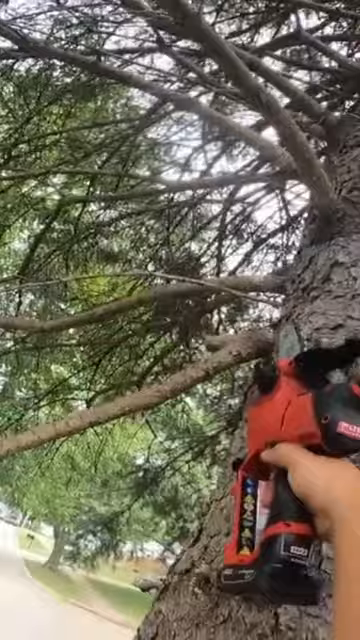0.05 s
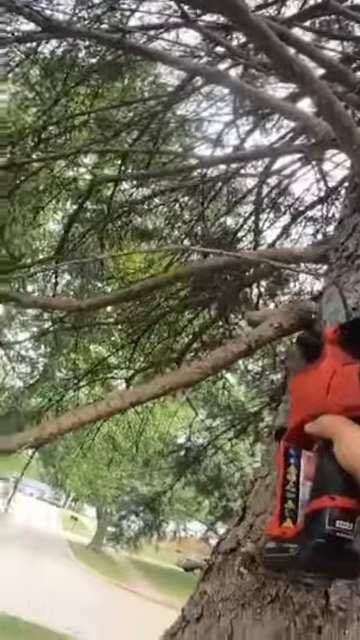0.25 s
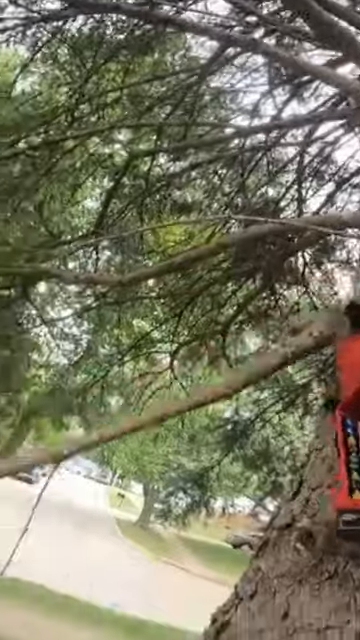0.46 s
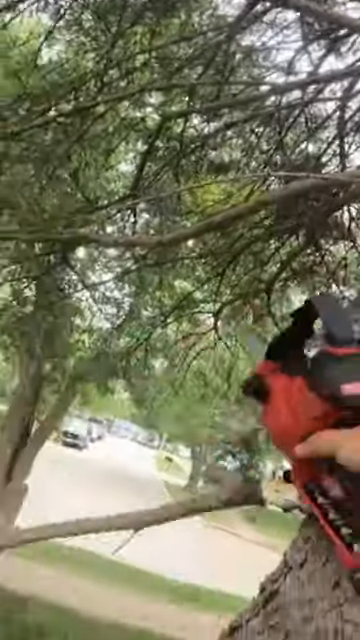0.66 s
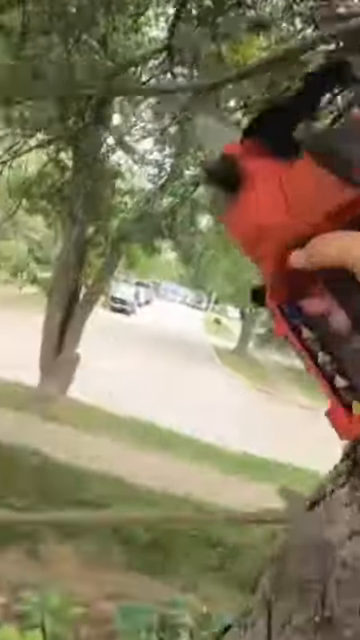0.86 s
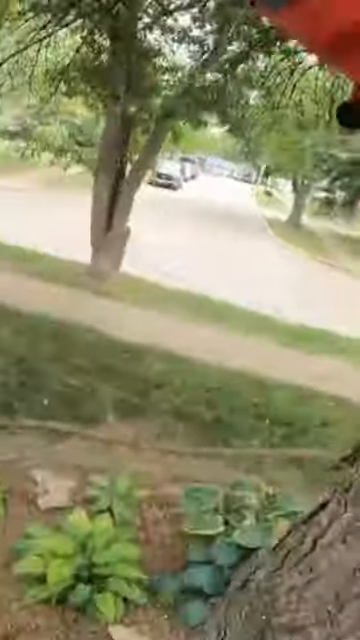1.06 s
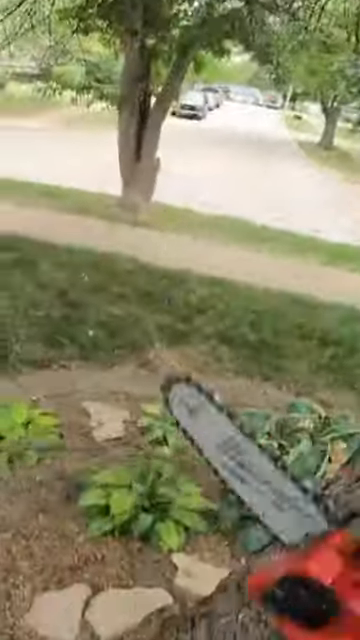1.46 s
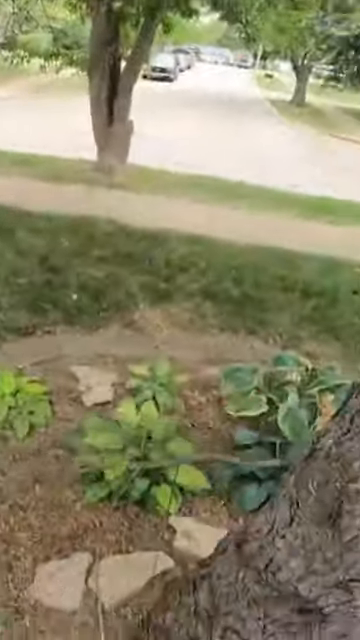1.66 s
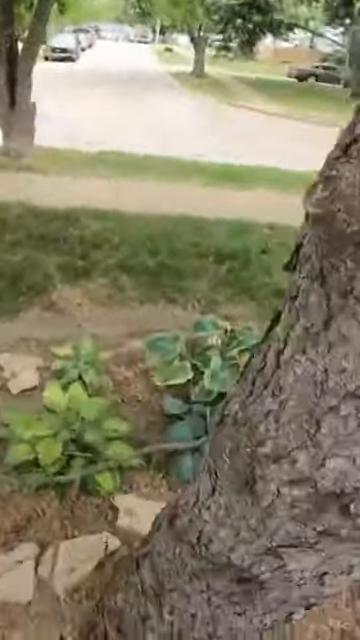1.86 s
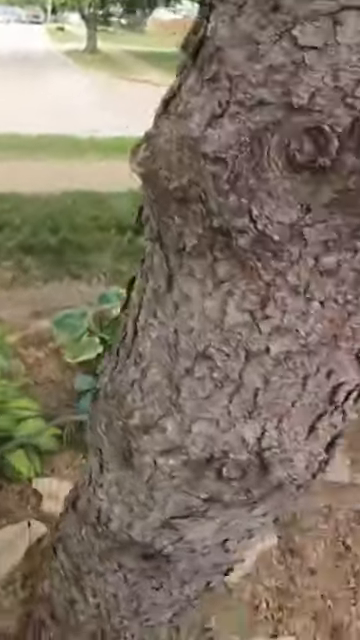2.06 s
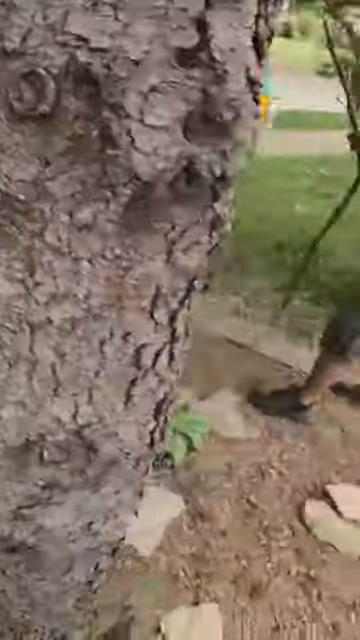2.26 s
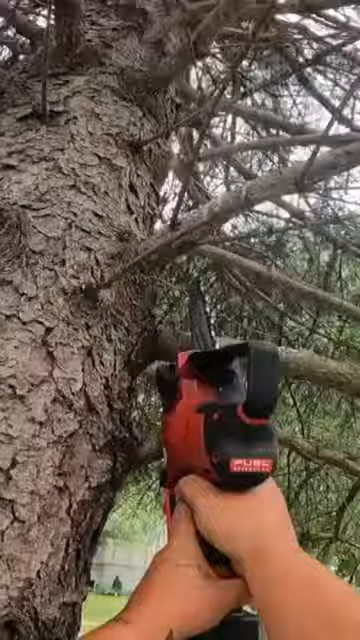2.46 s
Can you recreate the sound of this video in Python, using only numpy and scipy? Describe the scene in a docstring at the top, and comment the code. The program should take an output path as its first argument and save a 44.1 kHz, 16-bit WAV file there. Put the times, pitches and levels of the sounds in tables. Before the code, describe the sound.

A cordless chainsaw starts close by with a rattling squeal, chatters through a branch and whines down. The branch then lands with a swish and cracking twigs, while a distant engine hums faintly beyond the garden.

```python
"""A garden, one microphone close to a cordless pruning saw, mono; a far engine hums throughout.
The saw starts with a rattle and a squeal, and its teeth chatter through a conifer branch until the
last fibres snap. The gears whine down while the slack chain slaps the bar and clacks to rest.
The branch lands with a swish of needles, knocking limbs and cracking twigs.
Last, a foot scuffs the mulch."""
import sys
import numpy as np
from scipy import signal
from scipy.fft import rfft, irfft, next_fast_len
from scipy.io import wavfile
from scipy.ndimage import uniform_filter1d

SR = 44100
rng = np.random.default_rng(int(sys.argv[2]) if len(sys.argv) > 2 else 0)


def pcm_store(signal):
    """Save signal as 16-bit PCM."""
    levels = np.round(np.clip(np.atleast_2d(signal), -1, 1) * 32767)
    wavfile.write(sys.argv[1], SR, levels.astype(np.int16).T)


N = 110250
T = np.arange(N) / SR


def from_db(db):
    """Decibels to gain."""
    return 10 ** (np.asarray(db) / 20)


def unit_rms(x):
    """Scale to unit power."""
    return x / np.sqrt(np.mean(x ** 2) + 1e-20)


def level(rows):
    """Gain along a time_s, level_db curve, silent outside it."""
    return from_db(np.interp(T, *np.transpose(rows), left=-120, right=-120))


def drift(rate_hz):
    """Smooth random wander of unit power."""
    r = np.exp(-2 * np.pi * rate_hz / SR)
    return unit_rms(signal.lfilter([1], [1, -2 * r, r * r], rng.standard_normal(2 * N))[N:])


def phase_of(pitch_hz):
    """Running phase of a changing pitch."""
    return 2 * np.pi * np.cumsum(pitch_hz) / SR


def colour(x, outline):
    """Causal filter that follows a freq_hz, gain_db outline and keeps the power of white noise."""
    size = next_fast_len(2 * N)
    size += size % 2
    hz, db = np.transpose(outline)
    log_hz = np.log(np.maximum(np.arange(size // 2 + 1) * SR / size, 1))
    skirt = np.maximum(np.log(hz[0]) - log_hz, 0) + 10 * np.maximum(log_hz - np.log(hz[-1]), 0)
    gain = unit_rms(from_db(np.interp(log_hz, np.log(hz), db) - 20 * skirt))
    cepstrum = irfft(np.log(gain))
    cepstrum[1:size // 2] *= 2  # folded for minimum phase
    cepstrum[size // 2 + 1:] = 0
    return irfft(rfft(x, size) * np.exp(rfft(cepstrum)))[:N]


def resonance(x, hz, width_hz):
    """Two-pole resonance with gain 1 at its peak."""
    r = np.exp(-np.pi * width_hz / SR)
    feedback = [1, -2 * r * np.cos(2 * np.pi * hz / SR), r * r]
    return signal.lfilter(np.array([1, 0, -1]) * (1 - r * r) / 2, feedback, x)


def soften(x, cutoff_hz):
    """Gentle low-pass."""
    return signal.lfilter(*signal.butter(1, cutoff_hz, fs=SR), x)


def contacts(strengths, ring_s, hiss=1):
    """Each contact throws a tiny burst of noise, over a sliding hiss; the level is evened."""
    power = signal.lfilter([1], [1, -np.exp(-2 / (ring_s * SR))], strengths ** 2 + 1e-18)
    power = power + hiss ** 2 * power.mean()
    return np.sqrt(power / uniform_filter1d(power, size=700)) * rng.standard_normal(N)


def passes(rate_hz, spread_db):
    """One click for each passing link or tooth, uneven in time and strength."""
    count = np.floor(np.cumsum(rate_hz * (1 + .15 * drift(100))) / SR)
    return (np.diff(count, prepend=0) > 0) * from_db(spread_db * rng.standard_normal(N))


def impulses(rows):
    """One click for each start_s, level_db row."""
    clicks = np.zeros(N)
    for start_s, db in rows:
        clicks[int(start_s * SR)] += from_db(db)
    return clicks


def sharp_blows(rows, t60_s, outline):
    """Sudden noise bursts that die away in one body."""
    envelope = sum((T >= start_s) * from_db(db - 60 * np.abs(T - start_s) / t60_s)
                   for start_s, db in rows)
    return colour(envelope * rng.standard_normal(N), outline)


def soft_blows(rows, outline):
    """Noise bursts that swell to a peak and die away."""
    envelope = 0
    for peak_s, db, rise_s, t60_s in rows:
        swell = np.exp(np.minimum(T - peak_s, 0) / rise_s)
        envelope += swell * from_db(db - 60 * np.maximum(T - peak_s, 0) / t60_s)
    return colour(envelope * rng.standard_normal(N), outline)


# Engine tones: pitch_hz, start_level_db, end_level_db
ENGINE_TONES = [(91, -50, -66), (134, -58, -48), (242.8, -45.5, -57.5), (311.5, -56, -53),
                (377.6, -53.5, -62.5)]
def far_engine():
    """Well beyond the garden, an engine hums on wavering tones."""
    hum = 0
    for hz, start_db, end_db in ENGINE_TONES:
        waver = 1 + .46 * drift(8)
        tone = np.sin(phase_of(hz * (1 + .011 * drift(6.34))))
        hum += from_db(np.linspace(start_db, end_db, N)) * unit_rms(waver * tone)
    return hum


# Background murmur: time_s, level_db
AIR_LEVEL = [(0, -41), (.2, -39.5), (1.3, -42), (2.1, -40), (2.5, -38)]
# Its spectrum: freq_hz, gain_db
AIR_SPECTRUM = [(15, -37), (25, -12), (113, -2.5), (244, -2), (301, -5.5), (363, 4.5), (425, -3.5),
                (539, 0.5), (632, -2), (868, -5.5), (1730, -13.5), (4600, -23.5), (14000, -51.5)]
def garden_air():
    """Open air and distant traffic murmur around the microphone."""
    return level(AIR_LEVEL) * colour(rng.standard_normal(N), AIR_SPECTRUM)


# Resonances of bar and branch: freq_hz, width_hz, gain_db
BAR_RESONANCES = [(872, 83, -7), (1130, 150, -14.5), (1563, 39, -6.5), (2494, 48, -3), (4180, 67, -9)]
def bar_and_branch(x):
    """The bar and the branch ring along with the chain."""
    return x + sum(from_db(db) * resonance(x, hz, width) for hz, width, db in BAR_RESONANCES)


# Modes of the guide bar: pitch_hz, gain_db, t60_s
STEEL_MODES = [(692, -8, .15), (937, -2, .35), (1390, -2, .067), (1916, -4, .2), (2223, -6, .22),
               (2480, -4, .13), (2821, -6, .13), (3260, -16, .05), (4330, -5, .07), (4527, -9, .15),
               (5500, -8, .1), (8930, -10, .09)]
def steel_ring(force):
    """The struck steel guide bar rings in decaying modes."""
    ring = 0
    for k, (hz, db, t60_s) in enumerate(STEEL_MODES):
        r, angle = from_db(-60 / (t60_s * SR)), 2 * np.pi * hz / SR
        mode = signal.lfilter([0, np.sin(angle)], [1, -2 * r * np.cos(angle), r * r], force + 1e-18)
        ring += (-1) ** k * from_db(db) * mode
    return ring


# Rattle of the running chain: time_s, level_db
RATTLE_LEVEL = [(.195, -59), (.205, -35), (.228, -39), (.265, -20.5), (.33, -18), (.66, -27), (.685, -30),
                (.715, -22.5), (.732, -23), (.748, -21), (.772, -20.5), (.85, -22.5), (.92, -25.5),
                (1.02, -26.5), (1.11, -29.5), (1.15, -34.5), (1.19, -37), (1.3, -52)]
# Its spectrum: freq_hz, gain_db
RATTLE_SPECTRUM = [(150, -37.5), (300, -12), (470, -7), (700, -5), (850, -2), (1200, -3), (1450, -2.5),
                   (2100, -6.5), (2500, -3.5), (2870, -5), (3150, -3.5), (3750, -3), (4150, -9),
                   (5200, -9.5), (6000, -16), (7100, -16), (8300, -24.5), (9600, -28), (12000, -34),
                   (13200, -52), (14000, -67)]
def chain_rattle(link_hz, mesh_hz, dull_hz=1500, dull_below_mesh_hz=1320):
    """Links clatter over the sprocket; as they slow, they strike more softly and the bar rings through."""
    links = contacts(passes(link_hz, spread_db=4), ring_s=.0021)
    fast = unit_rms(bar_and_branch(colour(links, RATTLE_SPECTRUM)))
    ring = unit_rms(steel_ring(soften(links, dull_hz)))
    slow = soften(fast, dull_hz) + from_db(-18) * ring
    brightness = np.clip(mesh_hz / dull_below_mesh_hz, 0, 1)
    return level(RATTLE_LEVEL) * (brightness * fast + (1 - brightness) * slow)


# Gear tones: mesh_multiple, level_db
GEAR_PARTIALS = [(.55, -9), (1, 0), (1.29, -1), (1.56, -7), (2.28, -4.5)]
# How strongly the housing radiates: freq_hz, gain_db
HOUSING_RESPONSE = [(400, -16), (680, -3), (850, -7), (1150, 0), (1450, -7), (1850, 0), (2150, -8),
                    (2400, -1), (2550, -7), (2720, -3), (2950, -10), (3350, -6), (3720, 3), (4000, -4),
                    (4250, -8), (4800, -15), (7000, -16), (9000, -32), (12000, -60)]
# The whine, strongest while the motor brakes: time_s, level_db
WHINE_LEVEL = [(.195, -70), (.21, -50), (.28, -36), (.36, -41), (.72, -43), (.75, -37), (.77, -27.5),
               (.815, -29), (.86, -29), (.915, -26), (.96, -29.5), (1.005, -27.5), (1.03, -31), (1.06, -40),
               (1.11, -43), (1.16, -55)]
def gear_whine(mesh_hz, wobble=.005, roughness=.38):
    """Rough tones follow the gear speed and swell as they cross the housing's resonances."""
    phase = phase_of(mesh_hz * (1 + wobble * drift(61)))
    whine = 0
    for multiple, db in GEAR_PARTIALS:
        radiated_db = np.interp(multiple * mesh_hz, *np.transpose(HOUSING_RESPONSE))
        tone = unit_rms((1 + roughness * drift(34)) * np.sin(multiple * phase))
        whine += from_db(db + radiated_db) * tone
    return level(WHINE_LEVEL) * whine


# The chain squealing in its groove: time_s, level_db
SQUEAL_LEVEL = [(.195, -70), (.21, -37), (.225, -33), (.243, -25.5), (.26, -23), (.283, -15), (.297, -21.5),
                (.308, -15.5), (.322, -16), (.338, -31), (.352, -25), (.365, -29), (.4, -22), (.45, -24),
                (.465, -20), (.487, -33), (.525, -29), (.54, -38), (.568, -40), (.585, -24), (.612, -23.5),
                (.64, -40), (.68, -60)]
def chain_squeal(pitch_hz=3600, wander_hz=68, width_hz=560, bite_s=.33):
    """Friction keeps one mode of the bar singing, with its octave; it roughens as the teeth bite."""
    phase = phase_of(pitch_hz + wander_hz * drift(128))
    flutter = 1 + .45 * drift(220)
    tone = unit_rms(flutter * (np.sin(phase) + from_db(-23) * np.sin(2 * phase)))
    rasp = resonance(rng.standard_normal(N), pitch_hz, width_hz)
    rasp = unit_rms(resonance(rasp, pitch_hz, width_hz))
    rasp_share = np.clip(.5 + (T - bite_s) / .02, .2, .3)
    return level(SQUEAL_LEVEL) * (np.sqrt(1 - rasp_share) * tone + np.sqrt(rasp_share) * rasp)


# Whistle of the motor: time_s, level_db
WHISTLE_LEVEL = [(.2, -64), (.215, -58), (.25, -57), (.29, -58)]
def motor_whistle(pitch_hz=7800, wander_hz=70):
    """The starting motor gives a thin whistle, faint even this close."""
    return level(WHISTLE_LEVEL) * unit_rms(np.sin(phase_of(pitch_hz + wander_hz * drift(150))))


# Ticks of trigger and chain: start_s, level_db
TICK_HITS = [(.2025, -40), (.2095, -22.5), (.259, -31), (.269, -19), (.432, -13), (.73, -14.5), (.919, -24),
             (1.308, -45)]
def ticks():
    """Trigger and chain tick sharply."""
    # freq_hz, gain_db
    spectrum = [(800, -12), (3000, -9), (7000, -.5), (9000, -8.5), (14000, -29)]
    return sharp_blows(TICK_HITS, t60_s=.0035, outline=spectrum)


# Force of the teeth in the wood: time_s, level_db
BITE_LEVEL = [(0.25, -36), (0.296, -40), (0.308, -38), (0.316, -34), (0.324, -37), (0.358, -14.5),
              (0.366, -63), (0.38, -20), (0.402, -18.5), (0.418, -24), (0.432, -17), (0.446, -23.5),
              (0.468, -15.5), (0.479, -19.5), (0.492, -17), (0.504, -21), (0.513, -15), (0.52, -18.5),
              (0.531, -13.5), (0.54, -23), (0.554, -18.5), (0.562, -34), (0.572, -15.5), (0.586, -21),
              (0.596, -21), (0.642, -18.5), (0.666, -18), (0.69, -32.5)]
# Spectrum of tearing wood: freq_hz, gain_db
WOOD_SPECTRUM = [(71, -75), (120, -17), (182, -15), (325, -12.5), (447, -12.5), (735, -8.5), (862, -3),
                 (1230, 1), (1390, -4), (1760, -1), (2330, -8), (3610, -6), (4410, -9.5), (6840, -11.5),
                 (9030, -21.5), (11700, -20.5), (14000, -50)]
def cutting_teeth(link_hz):
    """Every second link carries a tooth that tears at the wood; the saw bounces in the kerf."""
    teeth = contacts(passes(link_hz / 2, spread_db=3.5), ring_s=.0025)
    tearing = soften(colour(teeth, WOOD_SPECTRUM), cutoff_hz=5130)
    return from_db(2) * level(BITE_LEVEL) * unit_rms(bar_and_branch(tearing))


# Spectrum of the breaking fibres: freq_hz, gain_db
SNAP_SPECTRUM = [(300, -22), (2500, -14), (3800, 0), (5200, -1), (7500, -18), (16500, -24)]
def branch_snap(start_s=.6735, crack_db=10, tail_db=-15):
    """The last fibres break with one crack and a short tail."""
    crack = colour(impulses([(start_s, crack_db)]), SNAP_SPECTRUM)
    return crack + sharp_blows([(start_s, tail_db)], t60_s=.012, outline=SNAP_SPECTRUM)


# Slaps on the bar: peak_s, level_db, rise_s, t60_s
SLAP_BLOWS = [(.731, -19, 0.0032, 0.048), (.768, -19.5, 0.0025, 0.17), (.81, -20, 0.0021, 0.073)]
# Their spectrum: freq_hz, gain_db
SLAP_SPECTRUM = [(600, -34), (850, -1), (1200, -1.5), (1500, -17), (3000, -34)]
def chain_slaps():
    """The loose chain slaps the bar as it coasts."""
    return soft_blows(SLAP_BLOWS, SLAP_SPECTRUM)


# Groan of the chain in its groove: time_s, level_db
GROAN_LEVEL = [(1.06, -46), (1.085, -34), (1.14, -37.5), (1.18, -66)]
def chain_groan(pitch_hz=685):
    """The stopping chain groans in its groove on one unsteady note and its octave."""
    phase = phase_of(pitch_hz * (1 + .027 * drift(26.3)))
    return level(GROAN_LEVEL) * unit_rms(np.sin(phase) + from_db(-4) * np.sin(2 * phase))


# Last clacks of the chain: start_s, level_db
CLACK_HITS = [(1.1982, -22), (1.2052, -31), (1.2208, -27), (1.2278, -29.5), (1.2442, -32), (1.254, -37),
              (1.2678, -35.5), (1.279, -35.5)]
# Their spectrum: freq_hz, gain_db
CLACK_SPECTRUM = [(300, -11), (950, -6), (2800, -9), (3700, -12.5), (5400, -13.5), (6300, -24), (9000, -32),
                  (13000, -56)]
def chain_clacks():
    """The slack chain clacks on the bar and sets the steel ringing."""
    clacks = sharp_blows(CLACK_HITS, t60_s=.028, outline=CLACK_SPECTRUM)
    return clacks + from_db(-11) * steel_ring(impulses(CLACK_HITS))


# Foliage sweeping the ground: time_s, level_db
SWISH_LEVEL = [(1.25, -48), (1.35, -45), (1.4, -41), (1.44, -42), (1.48, -35), (1.535, -27.5), (1.555, -29),
               (1.577, -26), (1.592, -35), (1.66, -35.5), (1.725, -38), (1.74, -33), (1.79, -32.5),
               (1.81, -28.5), (1.865, -30), (1.89, -32.5), (1.925, -32), (1.945, -34), (1.985, -37.5),
               (2.07, -40), (2.11, -44), (2.16, -41), (2.2, -52), (2.365, -52), (2.38, -39), (2.41, -42),
               (2.44, -52), (2.5, -53)]
# Its spectrum: freq_hz, gain_db
SWISH_SPECTRUM = [(120, -12), (200, -4), (306, -1), (551, -5.5), (786, -2), (956, -7), (1120, -4.5),
                  (2130, 0), (5080, -5.5), (7250, -15.5), (8980, -26), (11900, -30), (14000, -57)]
def needle_swish(needles_per_s=2300, spread_db=2):
    """Twigs and needles brush the ground in many tiny contacts as the branch lands and rolls nearby."""
    sizes = from_db(spread_db * np.minimum(rng.exponential(1, N), 5))
    touches = rng.random(N) < needles_per_s / SR
    needles = contacts(sizes * touches, ring_s=.0006, hiss=.65)
    return from_db(.5) * level(SWISH_LEVEL) * colour(needles, SWISH_SPECTRUM)


# Blows on the soil: peak_s, level_db, rise_s, t60_s
THUD_BLOWS = [(1.4, -41, .02, .15), (1.516, -29.5, .022, .12), (1.835, -38, .02, .08),
              (1.907, -37, .004, .08), (2.06, -41, .03, .2)]
# Their spectrum: freq_hz, gain_db
THUD_SPECTRUM = [(60, -7), (150, -11), (290, 0.5), (450, -4), (900, -8), (3000, -31)]
def soil_thuds():
    """The soil yields under the branch with dull thuds."""
    return soft_blows(THUD_BLOWS, THUD_SPECTRUM)


# Limbs striking the ground: start_s, pitch_hz, peak_db, rise_s
LIMB_HITS = [(1.49, 430, -30, .003), (1.5075, 300, -23, .003), (1.5185, 900, -25, .0012),
             (1.5355, 1330, -22, .0025), (1.538, 1000, -26, .002)]
def limb_knocks():
    """Each limb that meets the ground rings briefly, damped by the soil."""
    knocks = 0
    for start_s, hz, db, rise_s in LIMB_HITS:
        age_s = np.maximum(T - start_s, 0)
        envelope = age_s / rise_s * np.exp(1 - age_s / rise_s)
        knocks += from_db(db) * envelope * np.sin(2 * np.pi * hz * age_s)
    return knocks


# Cracking twigs: start_s, level_db
TWIG_HITS = [(1.492, -27), (1.5175, -21), (1.538, -18.5), (1.57, -24), (1.695, -33), (1.7365, -28),
             (1.7965, -28), (1.825, -23), (1.858, -22.5), (1.906, -17), (1.918, -22), (1.9535, -21),
             (1.958, -24), (2.063, -33), (2.164, -35), (2.296, -37)]
def twig_cracks():
    """Twigs crack as the branch rolls over on them."""
    # freq_hz, gain_db
    spectrum = [(200, -22), (1400, 5), (3300, 8), (6000, -1), (8500, -13.5), (14000, -34)]
    return sharp_blows(TWIG_HITS, t60_s=.024, outline=spectrum)


# One footfall: peak_s, level_db, rise_s, t60_s
FOOTFALL = [(2.402, -29.5, 0.02, 0.15)]
# Spectrum of trodden mulch: freq_hz, gain_db
MULCH_SPECTRUM = [(80, -9), (250, 7), (650, -1.5), (1200, 0), (4000, -27), (10000, -45)]
def footstep():
    """A foot scuffs soft mulch near the microphone."""
    return soft_blows(FOOTFALL, MULCH_SPECTRUM)


# Gear speed, which drives whine, chain and teeth: time_s, mesh_pitch_hz
GEAR_SPEED = [(.2, 3900), (.28, 3650), (.34, 3420), (.45, 3700), (.62, 3500), (.68, 3950), (.735, 3900),
              (.765, 3580), (.795, 3110), (.825, 2740), (.857, 2400), (.91, 1900), (.96, 1520), (1.0, 1200),
              (1.06, 800), (1.1, 640), (1.2, 200)]
def scene():
    """Saw, branch and foot close by, the garden behind; both channels are the same."""
    mesh_hz = np.interp(T, *np.transpose(GEAR_SPEED))
    link_hz = mesh_hz / 7  # seven gear meshes to a chain link
    garden = far_engine() + garden_air()
    running = chain_rattle(link_hz, mesh_hz) + gear_whine(mesh_hz)
    running += chain_squeal() + motor_whistle() + ticks()
    cutting = cutting_teeth(link_hz) + branch_snap()
    stopping = chain_slaps() + chain_groan() + chain_clacks()
    landing = needle_swish() + soil_thuds() + limb_knocks() + twig_cracks()
    mono = garden + running + cutting + stopping + landing + footstep()
    return np.array([mono, mono])


def record(dry, low_cut_hz=45, high_cut_hz=16400):
    """The microphone loses the deep bass and has two treble notches; peaks are rounded, the top cut."""
    x = signal.sosfilt(signal.butter(2, low_cut_hz, "high", fs=SR, output="sos"), dry)
    x = x - resonance(x, hz=8960, width_hz=410)
    x = x - .82 * resonance(x, hz=10520, width_hz=770)
    rounded = 1.208 * np.tanh(x / 1.213)
    return signal.sosfilt(signal.cheby2(12, 70, high_cut_hz, fs=SR, output="sos"), rounded)


dry = scene()
out = record(dry)
pcm_store(out)
```